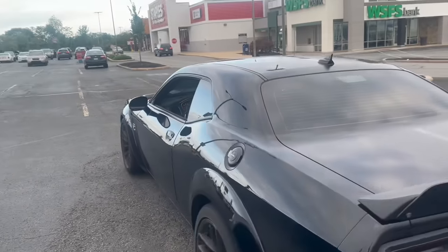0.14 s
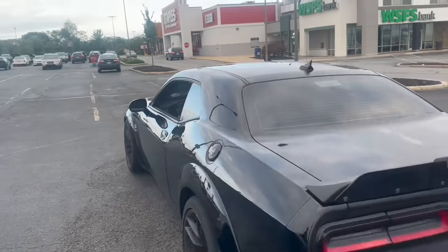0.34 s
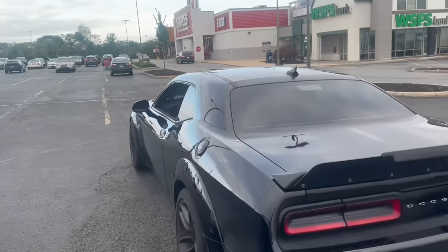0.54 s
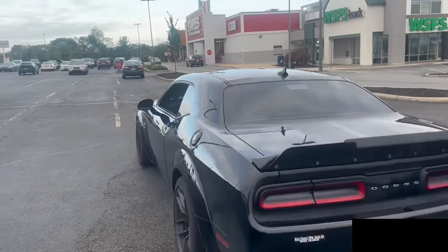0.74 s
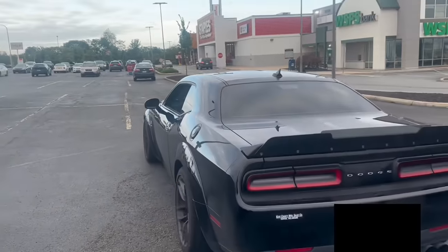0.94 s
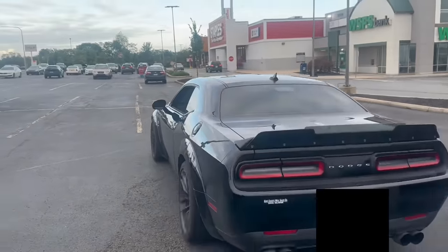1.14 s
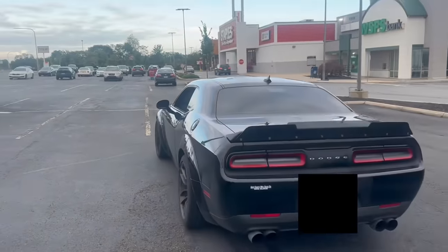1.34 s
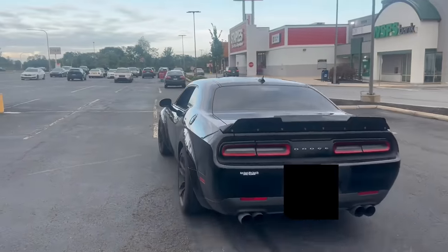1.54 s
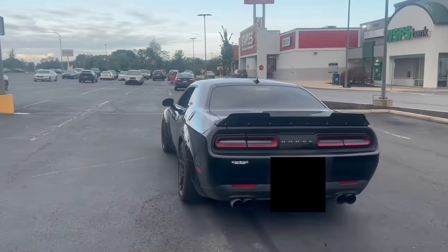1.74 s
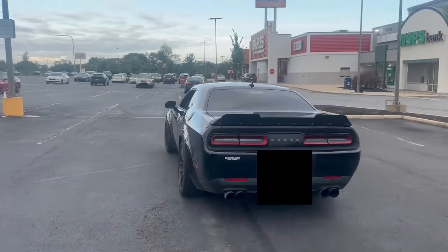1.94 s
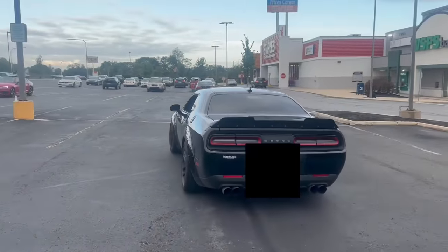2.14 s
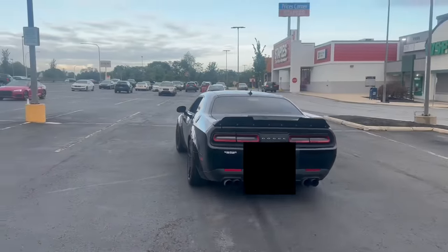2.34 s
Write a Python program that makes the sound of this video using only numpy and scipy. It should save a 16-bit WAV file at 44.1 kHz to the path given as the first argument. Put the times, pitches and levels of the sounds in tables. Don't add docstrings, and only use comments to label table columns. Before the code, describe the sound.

Close, deep V8 exhaust burble with a rough bark on each firing, slow at first, then revving smoothly higher as the car drives off; outdoor phone pickup, short asphalt reflections, light air hiss and tiny grit scuffs.

```python
import sys
import numpy as np
from scipy import signal
from scipy.fft import rfft, irfft, next_fast_len
from scipy.io import wavfile
from scipy.ndimage import map_coordinates

SR = 44100
rng = np.random.default_rng(int(sys.argv[2]) if len(sys.argv) > 2 else 0)


def decibels_to_gain(level_db):
    exponent = np.asarray(level_db, float) / 20
    return 10 ** exponent


def wav_out(sig):
    wavfile.write(sys.argv[1], SR, np.round(np.clip(np.atleast_2d(sig).T, -1, 1) * 32767).astype(np.int16))


N = 110250
TIME_S = np.arange(N) / SR
LEFT_RIGHT = np.array([[.5], [-.5]])


def unit(x):
    return x / np.sqrt(np.mean(x ** 2) + 1e-20)


def along(points, hz):
    point_hz, value = np.transpose(points)
    return np.interp(np.log(hz + 1), np.log(point_hz + 1), value)


def curves(rows):
    knot_s, *columns = np.transpose(rows)
    return [np.interp(TIME_S, knot_s, column) for column in columns]


def wobble(rate):
    knots = rng.standard_normal(int(N * rate / SR) + 4)
    return map_coordinates(knots, [np.arange(N) * rate / SR])


def filtered(x, response):
    size = next_fast_len(N + SR)
    sides = [(0, 0)] * (x.ndim - 1) + [(4096, 4096)]
    wide = np.pad(x, sides, "reflect", reflect_type="odd")
    wide = wide * signal.windows.tukey(N + 8192, 8192 / (N + 8192))
    spectrum = rfft(wide, size) * response(np.fft.rfftfreq(size, 1 / SR))
    return irfft(spectrum, size)[..., 4096:N + 4096]


# pitch_hz, likeness (0 to 1)
LIKENESS = [(60, 0.84), (180, 0.8), (550, 0.58), (1650, 0.44), (4970, 0.23), (15000, 0.092)]


def rush(spectrum):
    def middle_and_side(hz):
        angle = np.arccos(np.clip(along(LIKENESS, hz), -1, 1)) / 2
        return decibels_to_gain(along(spectrum, hz)) * [np.cos(angle), np.sin(angle)]

    mid, side = filtered(rng.standard_normal((2, N)), middle_and_side)
    return unit(np.array([mid + side, mid - side]))


def bursts(at, hz, width_s, db):
    k = np.arange(-512, 512)
    t = k / SR
    shape = np.exp(-(t / width_s[:, None]) ** 2 / np.where(t > 0, 2.6, 1))
    wave = decibels_to_gain(db)[:, None] * shape * np.cos(2 * np.pi * hz[:, None] * t)
    places = at[:, None] + k + 1024
    return np.bincount(places.ravel(), wave.ravel(), N + 4096)[1024:N + 1024]


# pitch_hz, level_db (per Hz)
AIR_LEVELS = [(1500, -26.5), (2500, -5.5), (2800, -13), (3900, -18.5), (9800, -26.5), (10300, -32),
              (10400, -76.5), (12400, -84), (12600, -35), (15700, -34)]
# pitch_hz, level_db (per Hz)
RUMBLE_COLOUR = [(30, -120), (38, -22.5), (60, -7), (150, 5), (350, -18), (600, -120)]


def background():
    air_db = -47.5 - 1.5 * TIME_S + 0.47 * wobble(2)
    hiss = decibels_to_gain(air_db + 1.5 * LEFT_RIGHT) * rush(AIR_LEVELS)
    return hiss + decibels_to_gain(-24) * rush(RUMBLE_COLOUR)


# start_s, length_s, pitch_hz, level_db
GRIT_SCUFFS = [
    (0.115, 0.083, 6870, -50),
    (0.166, 0.072, 7600, -51.5),
    (0.248, 0.017, 6660, -54),
    (0.295, 0.039, 6540, -50.5),
    (.615, 0.035, 6700, -55.5),
    (0.919, 0.06, 6350, -55),
    (1.135, 0.037, 6100, -57.5),
    (1.488, 0.18, 7000, -62.5),
    (1.766, .02, 6300, -62.5),
]


def scuffs():
    out = 0
    for start_s, length_s, hz, db in GRIT_SCUFFS:
        def near_pitch(f):
            return np.exp(-(np.log(f / hz + 1e-9) / 0.22) ** 2)

        band = unit(filtered(rng.standard_normal((2, N)), near_pitch))
        rise = (TIME_S - start_s) / 0.018
        fall = (start_s + length_s - TIME_S) / (.6 * length_s)
        shape = np.clip(np.minimum(rise, fall), 0, 1)
        out = out + decibels_to_gain(db + 1.0 * wobble(140)) * shape * (band[0] + 0.26 * band)
    return out


# start_s, pitch_hz, level_db (peak)
GRIT_TICKS = [
    (0.302, 7400, -41),
    (1.168, 8880, -32.5),
    (2.305, 7990, -39.5),
    (2.333, 6000, -50.5),
]


def ticks():
    start_s, hz, db = np.transpose(GRIT_TICKS)
    return bursts((start_s * SR).astype(int), hz, 0.0013 / 10 + 0 * start_s, db)


def bump():
    since_s = TIME_S - 2.31
    return decibels_to_gain(-17.5) * np.exp(-(since_s / 0.025) ** 2) * np.sin(2 * np.pi * 54.2 * since_s)


def grit():
    return (scuffs() + ticks()) * decibels_to_gain(7.5 * LEFT_RIGHT) + bump()


# time_s, firing_rate_hz
ENGINE_SPEED = [(0.0, 52.03), (0.25, 52.86), (0.5, 55.69), (0.7, 57.85), (0.9, 58.62), (1.1, 59.17),
                (1.25, 61.65), (1.5, 65.51), (1.75, 70.13), (1.95, 74.5), (2.15, 80.3), (2.3, 83.19),
                (2.5, 86.82)]


def crank():
    rate, = curves(ENGINE_SPEED)
    first_turn = .32
    return rate, first_turn + np.cumsum(rate) / SR


# lateness (share of an interval), rasp_db, spit_db
CYLINDER_HABITS = [(0.024, 0.5, -5.5), (-.04, 1, -6), (.06, 5.5, -3.5), (.02, -8.5, 1.2), (-0.066, 1, -4),
                   (.04, -2, 2), (-0.038, 0.5, -5.5), (.01, -1, -2)]


def firings():
    turn = crank()[1]
    count = np.arange(1, int(turn[-1]) + 1)
    cylinder = count % len(CYLINDER_HABITS)
    lateness = np.array(CYLINDER_HABITS)[cylinder, 0]
    return np.interp(count + lateness, turn, np.arange(N)).astype(int), cylinder


# pitch_hz, level_db (per Hz)
GAS_COLOUR = [(240, -28.5), (400, 4.5), (829, 0), (1110, -4), (1220, -14.5), (1430, -2.5), (1680, -15.5),
              (2400, -21), (4500, -46), (5850, -74.5), (9900, -120)]


def gas():
    level_db = curves(CAR_PASS)[0]
    pulse = 1 + 0.2 * np.cos(2 * np.pi * crank()[1])
    gas_db = -31.5 + .6 * (level_db - level_db.mean()) + 1.3 * wobble(52)
    return decibels_to_gain(gas_db) * pulse * rush(GAS_COLOUR)


# time_s, throttle_db
THROTTLE = [
    (0, -3.5),
    (.5, 1),
    (1.1, 4),
    (1.7, 3.5),
    (2.1, 5.5),
    (2.5, 4),
]
# pitch_hz, level_db (rms)
THROB_LEVEL = [(52, -15.5), (59, -17), (67, -17.5), (85, -26), (104, -13.5), (120, -14), (145, -15.5),
               (170, -19.5)]
SILENCER_DELAY = (.0201, .0092)


def throb():
    rate, turn = crank()
    load_db, = curves(THROTTLE)
    tones = []
    for order, delay_s in zip((1, 2), SILENCER_DELAY):
        level_db = along(THROB_LEVEL, order * rate) + load_db + 0.38 * wobble(14)
        tone = np.cos(2 * np.pi * order * (turn - rate * delay_s))
        tones.append(np.sqrt(2) * decibels_to_gain(level_db) * tone)
    lope_hz, lope_width_hz, lope_depth = 164, 33, .6
    near = lope_depth * np.exp(-((2 * rate - lope_hz) / lope_width_hz) ** 2)
    cycle = (turn - 0.23) / len(CYLINDER_HABITS)
    dip = (.5 + .5 * np.cos(2 * np.pi * cycle)) ** 2
    return tones[0] + tones[1] * (1 + near * (.5 - 0.92 * dip))


# pitch_hz, width_hz, level_db (rms), change_db_per_s
PIPE_NOTES = [
    (69.3, 16, -25.5, -2),
    (152.4, 21.5, -19, -1.5),
    (260.8, 30.9, -32, 5),
    (357.6, 15, -32.5, -1.5),
    (630, 164, -53, 6),
]
CYLINDER_PUSHES = [(.9, .6, .8, -0.78, 0.2), (-0.71, 0.88, -1.1, -0.91, 0.23), (.9, 1.4, 0.38, 1.7, 0.27),
                   (-1.2, 0.6, 0.34, -0.99, 2.7), (-1.2, -.2, .3, .5, 0.71), (0.54, -0.71, .9, 0.079, 1.4),
                   (-1.1, 0.79, -0.89, .1, .8), (-.3, 0.42, 0.58, -0.51, 0.42)]


def burble():
    at, cylinder = firings()
    pushes = np.array(CYLINDER_PUSHES)[cylinder] + .15 * rng.standard_normal((len(at), 1))
    out = 0
    for push, (hz, width_hz, db, change_db) in zip(pushes.T, PIPE_NOTES):
        def ring(f):
            narrow = 1j * f * width_hz
            wide = 3 * narrow
            return narrow / (hz * hz - f * f + narrow) * wide / (hz * hz - f * f + wide)

        pushed = unit(filtered(np.bincount(at, push, N), ring))
        flow = unit(filtered(rng.standard_normal(N), ring))
        flow_db = -4.5 if hz < 500 else 5
        out = out + decibels_to_gain(db + change_db * TIME_S) * (pushed + decibels_to_gain(flow_db) * flow)
    return out


# time_s, rasp_db, rasp_hz, left_right_db (positive is left)
CAR_PASS = [
    (0.0, -29, 1020, -10),
    (0.02, -29.5, 980, -3.5),
    (0.41, -27, 881, -2.5),
    (0.89, -28.5, 912, -0.5),
    (1.75, -34, 1183, -1.5),
    (2.21, -37, 730, 1.0),
    (2.5, -43, 754, 3),
]
CYLINDER_BARK = [-1, 6, 0, -2, -3, -2, 2, -1]


def rasp():
    at, cylinder = firings()
    _, habit_db, habit_spit_db = np.array(CYLINDER_HABITS)[cylinder].T
    pass_db, rasp_hz, _ = (column[at] for column in curves(CAR_PASS))
    time_s = at / SR
    echo_ms = curves(GROUND_DELAY)[0][at]
    rasp_db = pass_db - 5
    spit_db = -49.5 + 1.42 * curves(THROTTLE)[0][at] + 12.5
    lift_db = -20 * np.clip(time_s - 1.83, 0, 1) ** .5
    rasp_s, spit_s = 0.0026, .0012
    layers = [(rasp_hz, rasp_s, rasp_db + np.array(CYLINDER_BARK)[cylinder] + 10.5),
              (1.398 * rasp_hz, rasp_s, rasp_db + habit_db + 3),
              (2000 / echo_ms, spit_s, spit_db + habit_spit_db + lift_db),
              (2020 + 0 * at, spit_s, spit_db - 11.5 + 4 * time_s),
              (2700 / echo_ms, spit_s, spit_db - 11 - 4 * time_s)]
    out = 0
    for hz, width_s, db in layers:
        size, pitch, late, long = np.clip(rng.standard_normal((4, len(at))), -1.7, 1.7)
        late_samples = (late * .0008 * SR).astype(int)
        out = out + bursts(at + late_samples, hz * np.exp(.085 * pitch),
                           width_s * np.exp(0.3 * long), db + 2.2 * size)
    return out


# time_s, delay_ms
GROUND_DELAY = [(0, 1.05), (.5, 1.024), (1.0, 0.83), (1.4, 0.821), (1.9, 0.718), (2.5, 0.77)]


def ground(x):
    late = np.arange(N) - curves(GROUND_DELAY)[0] * SR / 1000
    return x + 0.33 * np.array([map_coordinates(side, [late], mode="nearest") for side in x])


def yard(x):
    t = np.arange(SR // 4) / SR
    tail = rng.standard_normal((2, len(t))) * decibels_to_gain(-60 * t / .08)
    return signal.fftconvolve(x[None], tail / np.linalg.norm(tail[0]), axes=1)[:, :N]


# pitch_hz, left_lead_radians
LEFT_LEAD = [(0, 2.6), (1380, -0.48), (2900, 1.2), (3400, 1.9), (5000, 0)]


def scene():
    tail, pipe, pan_db = rasp(), burble(), curves(CAR_PASS)[2]
    near = ground(tail + gas()) * decibels_to_gain(LEFT_RIGHT * pan_db)
    near = filtered(near, lambda hz: np.exp(1j * LEFT_RIGHT * along(LEFT_LEAD, hz)))
    low = throb() * decibels_to_gain(-.4 * LEFT_RIGHT) + pipe * decibels_to_gain(-1.1 * LEFT_RIGHT)
    echoes = decibels_to_gain(-7) * yard(tail + .4 * pipe)
    return low + near + echoes + background() + grit()


def band_limit(x):
    return signal.sosfilt(signal.butter(12, 16300, fs=SR, output="sos"), x)


def record(dry):
    soft = dry / (1 + np.abs(dry) ** 8) ** (1 / 8)
    band = filtered(soft, lambda hz: (hz < 15750) & ((hz < 10350) | (hz > 12500)))
    edge_s = .004
    mix = band * signal.windows.tukey(N, 2 * edge_s * SR / N)
    return band_limit(mix)


dry = scene()
out = record(dry)
wav_out(out)
```